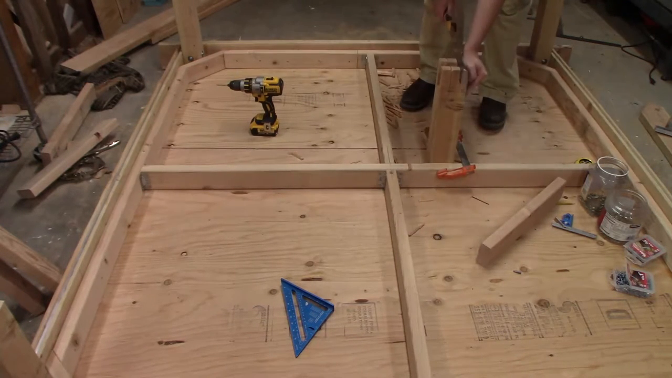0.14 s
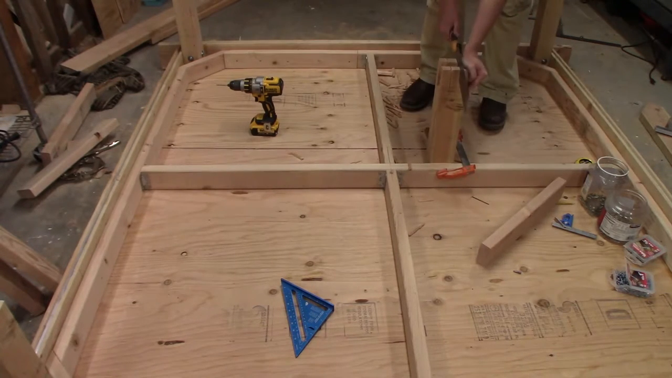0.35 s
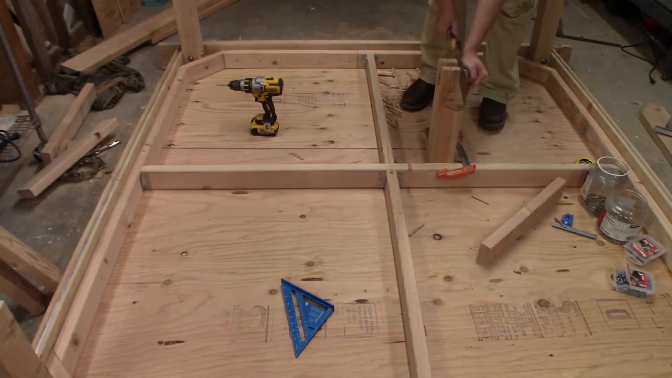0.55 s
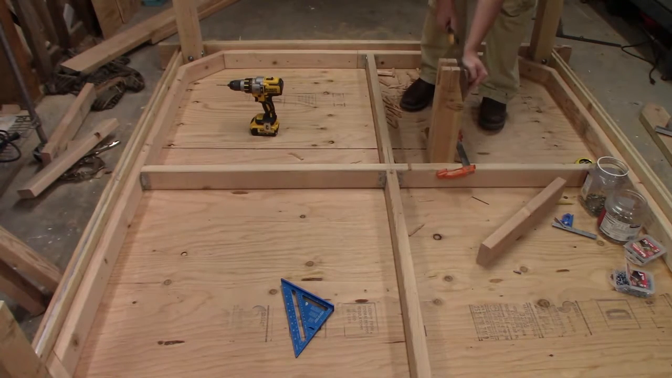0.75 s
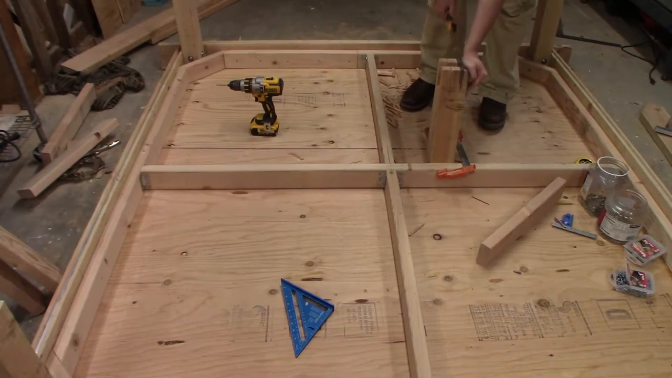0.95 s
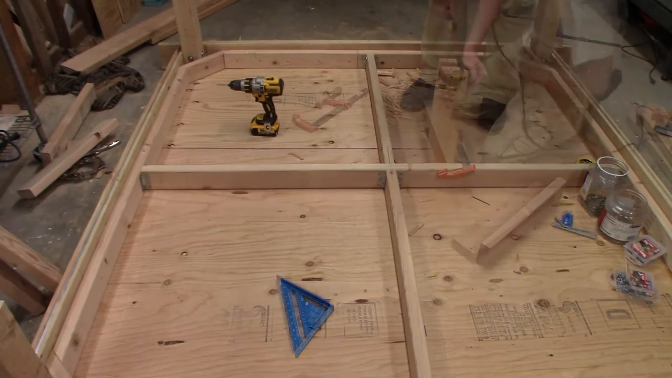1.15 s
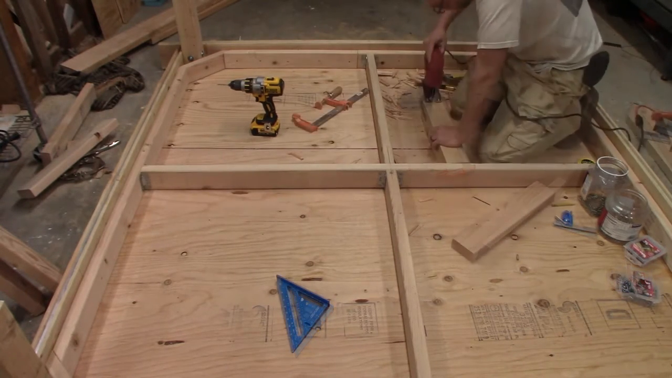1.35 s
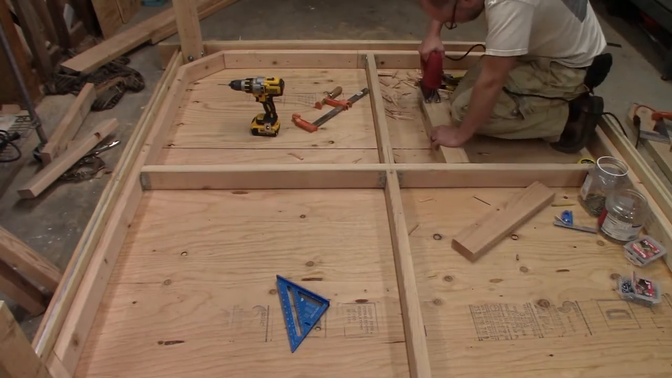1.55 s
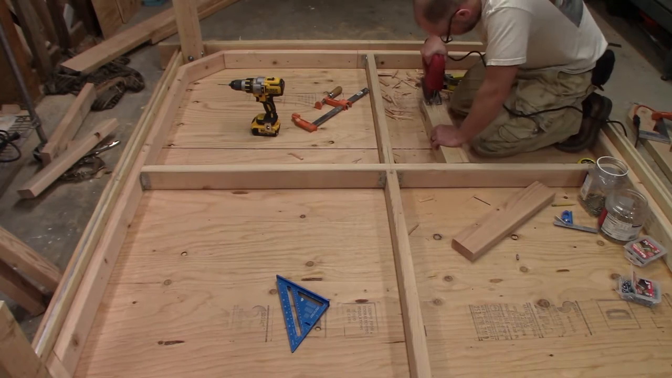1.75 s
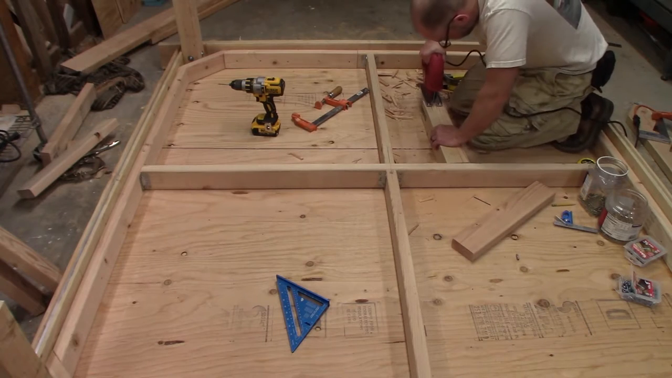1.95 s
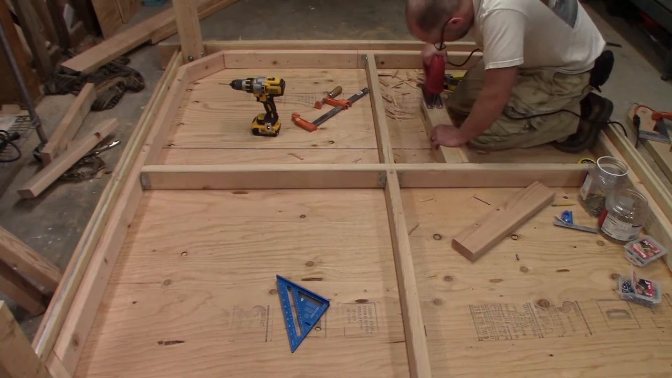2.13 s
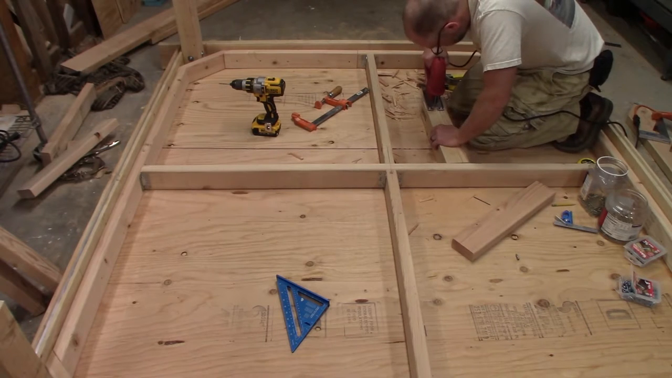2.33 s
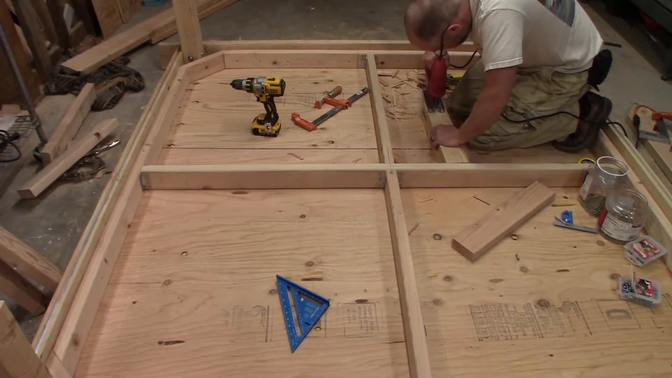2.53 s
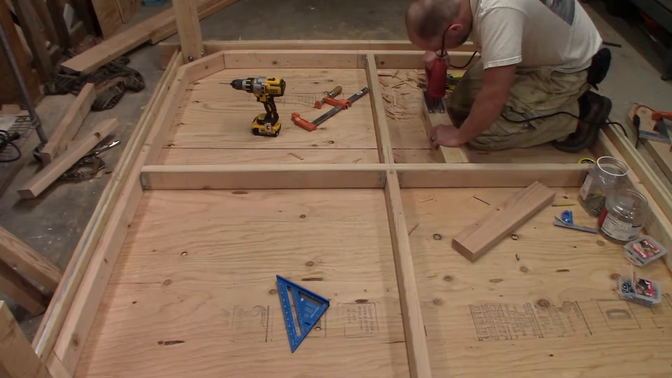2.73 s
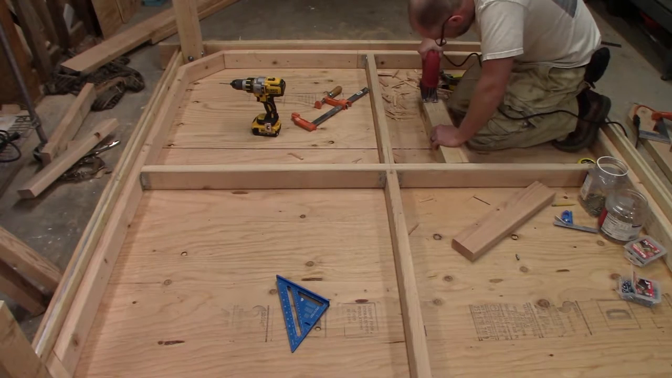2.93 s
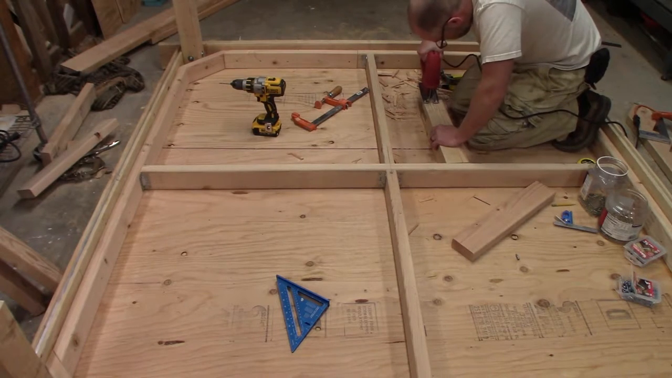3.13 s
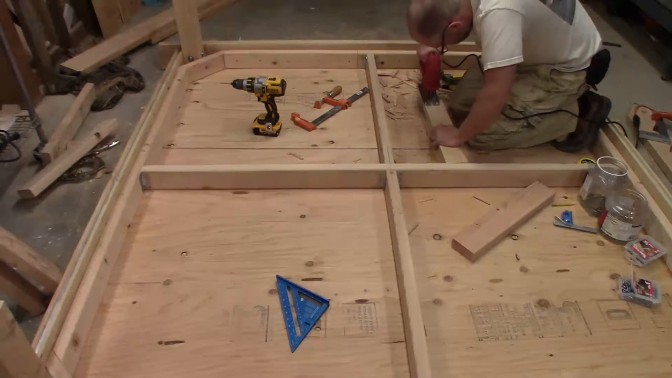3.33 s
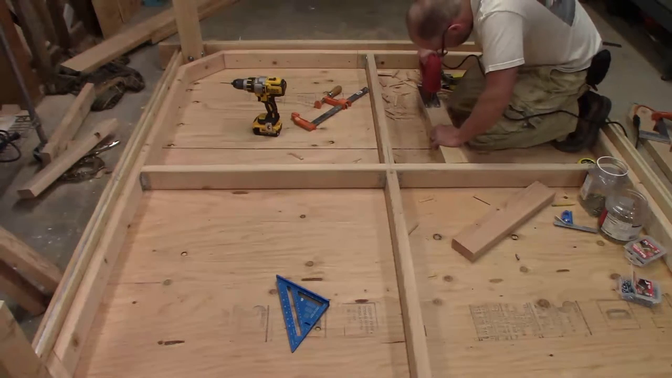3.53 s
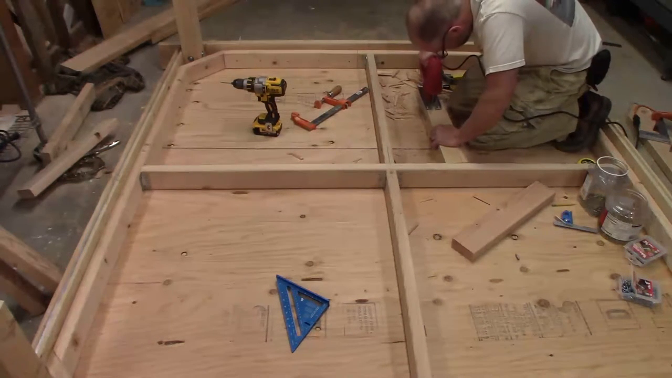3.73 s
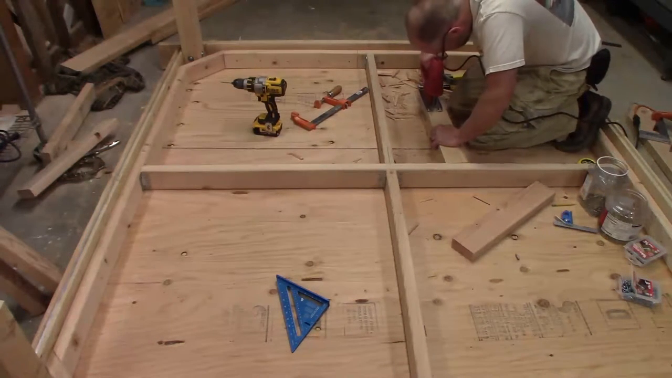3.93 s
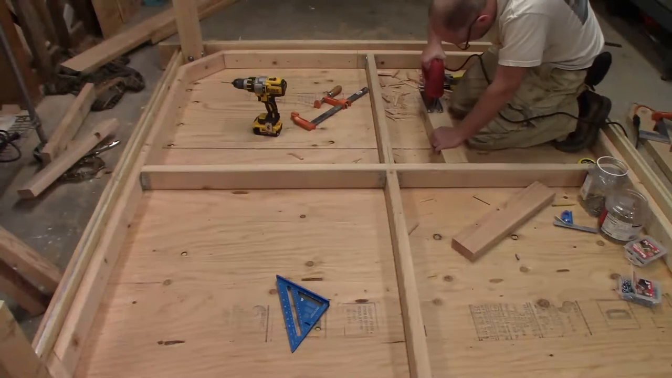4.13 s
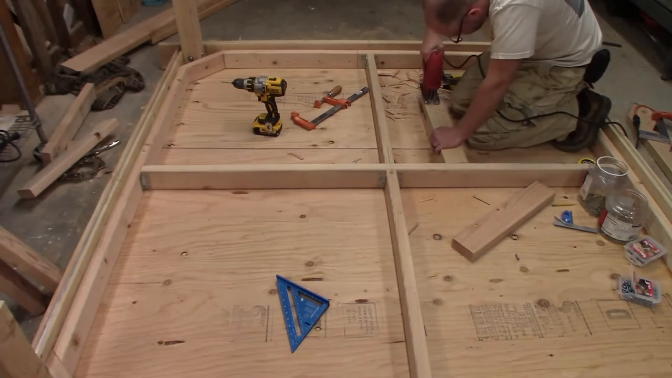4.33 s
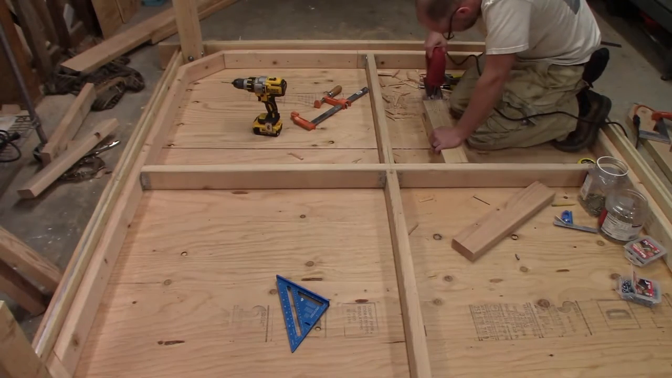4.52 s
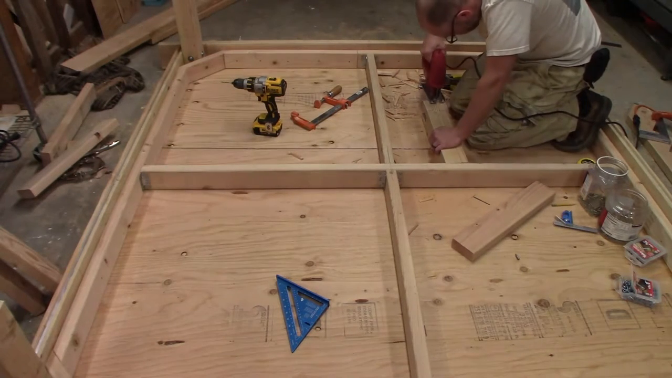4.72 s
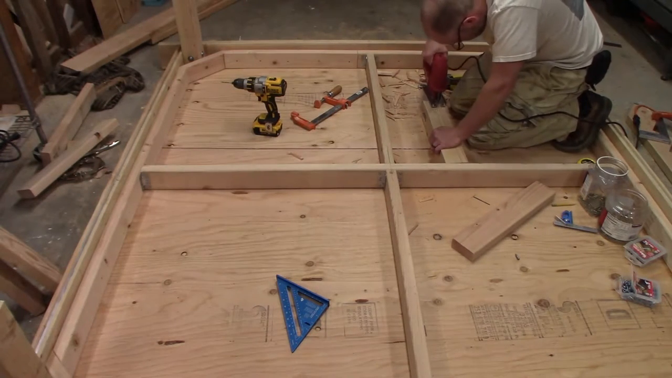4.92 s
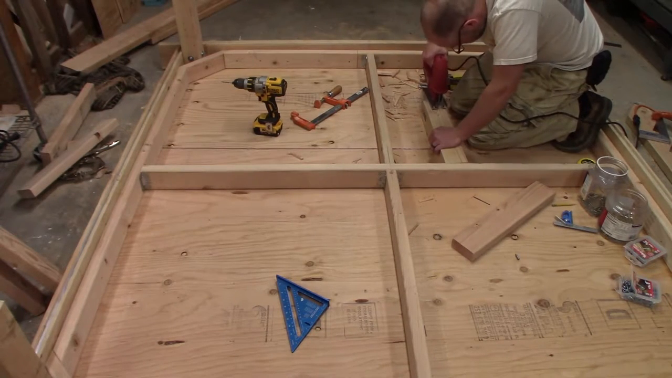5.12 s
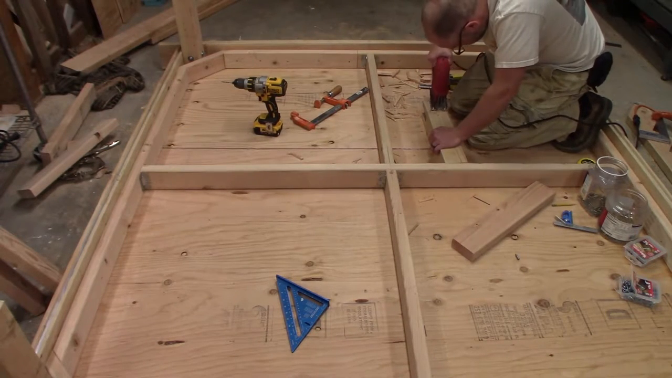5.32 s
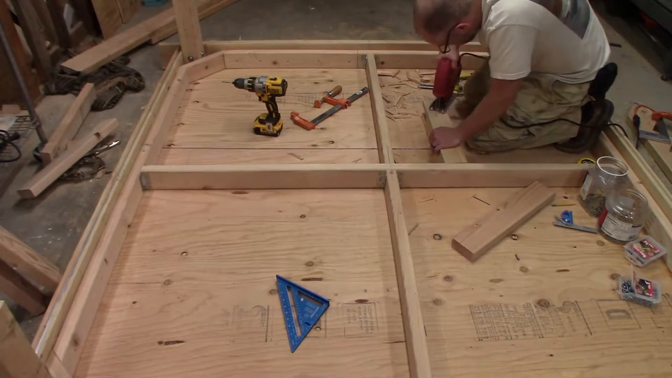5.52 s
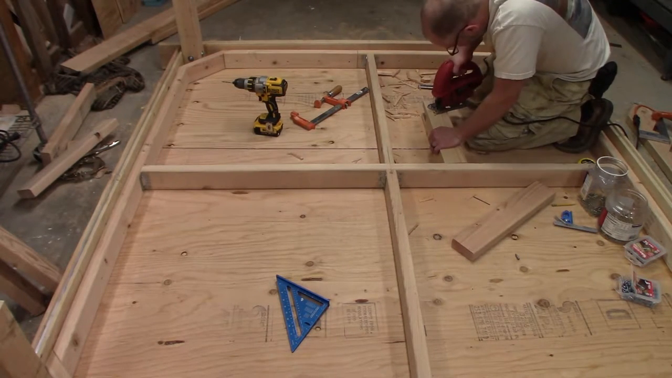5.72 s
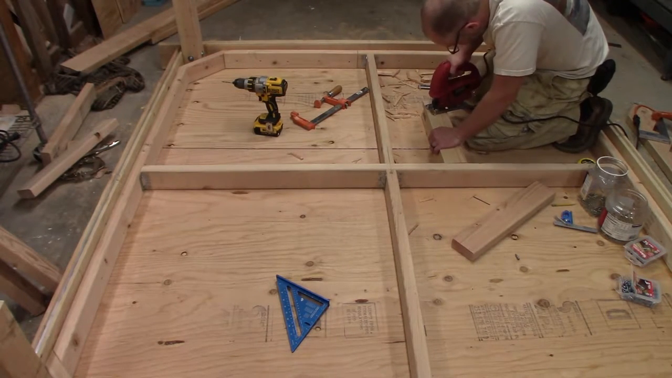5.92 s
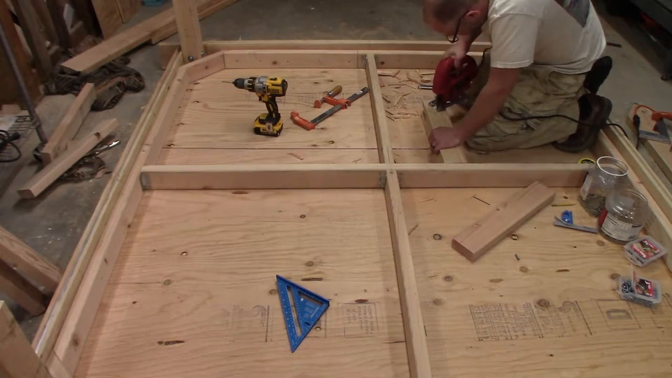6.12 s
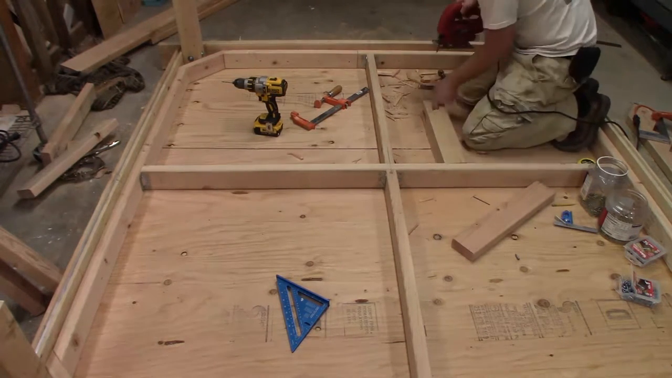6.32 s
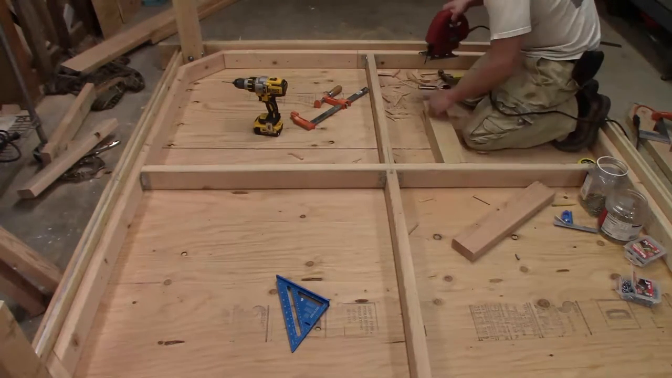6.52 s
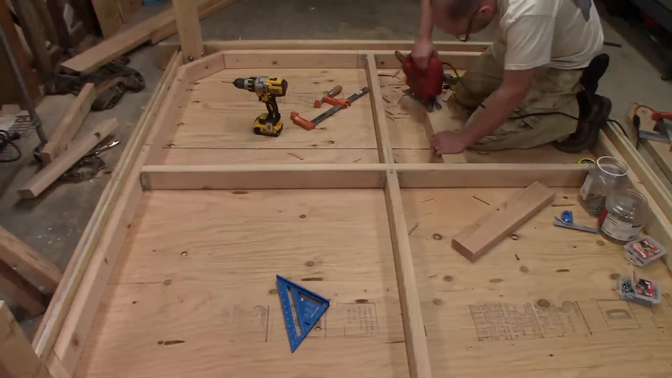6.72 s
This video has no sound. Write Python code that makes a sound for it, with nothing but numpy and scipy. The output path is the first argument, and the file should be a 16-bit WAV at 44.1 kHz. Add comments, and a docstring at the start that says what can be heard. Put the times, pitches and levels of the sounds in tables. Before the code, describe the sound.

Speeded-up workshop sawing: rapid dry hand strokes with a ringing steel edge, ending in a hard cut. Then an electric jigsaw whirs up, chattering as its blade enters the sheet, with hard fast knocks merged into a buzz, coarse rasp and rushing air. The motor falls silent gradually between two runs and after the last. Clacks of timber and metal ticks punctuate it, with short room reflections and quiet room noise.

```python
"""A corded jigsaw runs twice in plywood, heard at several times its natural speed: its gear whines and sinks under
load, each blade stroke knocks the sheet, teeth rasp, air rushes, and after each run the motor coasts down.
Before it, up to an abrupt change of scene, a hand saw scrapes to and fro in short strokes of shaped noise.
Tools and timber knock now and then over quiet room noise; two faint hum tones join in the second scene.
Pulses and tones follow one crank angle; noise and pulses are coloured by the bodies they excite."""
import sys
import numpy as np
from scipy import signal
from scipy.fft import rfft, irfft, next_fast_len
from scipy.io import wavfile
from scipy.ndimage import uniform_filter1d, map_coordinates

SR = 44100
rng = np.random.default_rng(int(sys.argv[2]) if len(sys.argv) > 2 else 0)


def pcm_store(signal):
    """Save signal as 16-bit PCM."""
    levels = np.round(np.clip(np.atleast_2d(signal), -1, 1) * 32767)
    wavfile.write(sys.argv[1], SR, levels.astype(np.int16).T)


N = 298108
TIME = np.arange(N) / SR
SCENE_CHANGE_S = 1.246
SPIN_UP_S = 0.1

# Jigsaw motor in the second run, trigger held. Each row: time in seconds, speed in strokes per second.
SECOND_RUN = [(4.8, 178.1), (4.832, 197.3), (4.894, 211.4), (5.0, 217.4), (5.302, 209.5), (5.448, 217.3),
              (5.708, 200.1), (5.78, 215.9), (6.11, 232.8)]
# Blade pushed into the wood. Each row: touch in seconds, seated in the kerf in seconds, then levels in dB
# of knock, rasp, chatter and scrape, before the trims and ranges applied below.
CUTS = [(1.549, 1.887, -42.5, -50, -32.5, -43), (3.018, 3.35, -42.5, -50.5, -34.5, -52),
        (4.76, 4.895, -37, -49, -42.5, -52), (5.424, 5.475, -44, -49.5, -66, -62),
        (5.801, 5.823, -36, -42.5, -52.5, -57.5)]


def amp(db):
    """Decibels to gain."""
    return 10 ** (np.asarray(db) / 20)


def unit(x):
    """Scale to rms 1."""
    return x / np.sqrt(np.mean(x ** 2) + 1e-20)


def along(points, hz):
    """Read (Hz, value) points on a log frequency axis."""
    f, v = np.transpose(points)
    return np.interp(np.log(hz + 1), np.log(f), v)


def smooth(x, seconds):
    """Running mean."""
    return uniform_filter1d(1. * x, size=max(1, int(seconds * SR)))


def wobble(rate):
    """Smooth random curve at rms 1, rate knots per second."""
    knots = rng.standard_normal(int(N * rate / SR) + 4)
    return unit(map_coordinates(knots, [TIME * rate]))


def sine(turns):
    """Sine of rms 1, one cycle per turn."""
    return np.sqrt(2) * np.sin(2 * np.pi * turns)


def filtered(x, response):
    """x times a response of frequency in Hz."""
    m = next_fast_len(N + SR // 2)
    return irfft(rfft(x, m) * response(np.fft.rfftfreq(m, 1 / SR)), m)[:N]


def coloured(x, spectrum, size=2048):
    """x through a minimum-phase body with the given (Hz, dB) spectrum, at rms 1."""
    gain = amp(along(spectrum, np.fft.rfftfreq(size, 1 / SR)))
    cepstrum = irfft(np.log(gain))
    # fold the cepstrum so that the response is causal
    cepstrum[1:size // 2] *= 2
    cepstrum[size // 2 + 1:] = 0
    impulse = irfft(np.exp(rfft(cepstrum)))
    return unit(signal.fftconvolve(x, impulse)[:N])


def resonant(x, modes):
    """x through (Hz, width Hz, dB) resonances of alternating sign, at rms 1."""
    def response(f):
        total = 0
        for k, (centre, width, db) in enumerate(modes):
            damping = 1j * f * width
            total = total + (-1) ** k * amp(db) * damping / (centre ** 2 - f * f + damping)
        return total
    return unit(filtered(x, response))


def grit(rate, depth_db):
    """Noise broken into grains of uneven size, at rms 1."""
    return unit(rng.standard_normal(N) * amp(depth_db * wobble(rate)))


def pulses(turns, scatter_db, jitter_s):
    """One pulse per whole turn, uneven in size and time."""
    whole = np.arange(1, int(turns[-1]))
    chance = rng.standard_normal((len(whole), 2))
    at = (np.interp(whole, turns, TIME) + jitter_s * chance[:, 0]) * SR
    # windowed sinc places each pulse between samples
    taps = at.astype(int)[:, None] + np.arange(-7, 9)
    offset = taps - at[:, None]
    shape = np.sinc(offset) * np.cos(np.pi * offset / 16) ** 2
    sized = shape * amp(scatter_db * chance[:, 1:])
    return np.bincount(np.clip(taps, 0, N - 1).ravel(), sized.ravel(), N)


def throb(turns, once, twice):
    """Gain at rms 1 that swells once per stroke and again at each reversal."""
    angle = 2 * np.pi * turns
    return unit(np.exp(once * np.cos(angle) + twice * np.cos(2 * angle)))


def workshop(x):
    """Short diffuse tail from floor and walls: unit-energy noise that decays sooner at high pitch."""
    # Each row: frequency in Hz, 60 dB decay time in seconds.
    room_decay = [(200, 0.3), (2000, 0.27), (12000, 0.067)]
    hz, t, z = signal.stft(rng.standard_normal(SR // 4), SR, nperseg=256)
    fading = z * amp(-60 * t / along(room_decay, hz)[:, None])
    tail = signal.istft(fading, SR, nperseg=256)[1]
    return signal.fftconvolve(x, tail / np.linalg.norm(tail))[:N]


def background():
    """Quiet room noise; in the second scene also an uneven rumble and two wavering hum tones."""
    # Room noise spectrum. Each row: frequency in Hz, relative density in dB per Hz.
    room_noise = [(25, -40), (80, -15.5), (170, -28), (270, -19), (430, -5.5), (570, -20.5), (700, -3.5),
                  (1000, -10.5), (1500, -16.5), (2200, -14), (6000, -18.5), (11500, -17.5), (15800, -43.5)]
    # Steady tones. Each row: frequency in Hz, mean level in dB.
    hum_tones = [(693, -82), (1520, -81)]
    hum = np.zeros(N)
    for hz, db in hum_tones:
        hum += amp(db + 2 * wobble(8)) * sine(hz * TIME + .7 * wobble(25) / (2 * np.pi))
    rumble_body = [(20, -18), (80, 1), (150, 0), (400, -28)]
    rumble = amp(-95 + 5.5 * wobble(9.8)) * coloured(rng.standard_normal(N), rumble_body)
    noise = amp(-76 + 0.44 * wobble(7.6)) * coloured(rng.standard_normal(N), room_noise)
    return (hum + rumble) * (TIME > SCENE_CHANGE_S) + noise


def knocks(t60_s=0.056, rise_s=.001):
    """Short contacts of tools and timber: a thud in the floor, a clack of wood and a tick of metal."""
    # Each row: start in seconds, level in dB of thud, clack and tick, relative to one another within a column.
    contacts = [(.148, -71, -71, -80), (1.148, -68, -45.5, -80), (1.374, -86, -73, -64.5),
                (1.548, -70, -56, -49), (1.692, -59, -66, -58), (1.902, -82, -60, -40),
                (3.14, -84, -35.5, -58), (3.191, -65, -55, -62), (4.688, -84, -48, -46),
                (5.82, -90, -38, -50), (6.005, -98, -40.5, -56), (6.419, -90, -61, -49),
                (6.735, -90, -76, -61)]
    bodies = [[(30, -12), (90, -9), (400, -4), (900, 2), (3000, -67)],
              [(100, -54), (500, -38), (900, 11), (1700, 14.0), (2600, 17), (6000, -16)],
              [(200, -55), (1000, -50), (4200, 7), (5500, 3), (7600, 1), (10000, 6), (15000, -11)]]
    sound = np.zeros(N)
    for k, body in enumerate(bodies):
        envelope = np.zeros(N)
        for row in contacts:
            age = TIME - row[0]
            envelope += amp(row[k + 1] - 60 * np.abs(age) / t60_s) * np.clip(age / rise_s, 0, 1)
        sound += envelope * coloured(rng.standard_normal(N), body)
    return sound


def squeak():
    """Thin rising squeak around switch-on: a gliding sine and a weaker one at two thirds of its pitch."""
    start, end = 1.505, 1.546
    hz = 6070 + 3500 * np.clip(TIME - start, 0, end - start)
    phase = 2 * np.pi * np.cumsum(hz) / SR
    gate = uniform_filter1d(1. * ((TIME > start) & (TIME < end)), size=200)
    return gate * (amp(-70) * np.sin(phase) + amp(-82) * np.sin(phase * 2 / 3))


def swell(middle_s):
    """Level of one hand stroke, which rises and falls around its middle."""
    bite_s, release_s = 0.012, 0.012
    t = TIME - middle_s
    return np.exp(-np.minimum(np.abs(t / np.where(t < 0, bite_s, release_s)), 4) ** 3)


def hand_saw():
    """Strokes swell and stop at the turn: teeth catch unevenly, rip the board and ring the steel."""
    # Forward strokes. Each row: middle in seconds, wood level in dB, blade level in dB before the blade trim.
    pushes = [(0.019, -51, -48.5), (.083, -49.5, -50.5), (0.143, -50.5, -54), (0.226, -59.5, -47),
              (0.297, -53.5, -45), (.377, -57, -49), (0.447, -49.5, -46.5), (.519, -50, -49),
              (0.59, -52.5, -49.5), (0.661, -49, -45), (0.73, -48.5, -44.5), (0.799, -47, -43.5),
              (0.867, -48, -44), (.935, -48.5, -45.5), (1.001, -46.5, -44), (1.068, -46, -44.5),
              (1.139, -50.5, -40.5), (1.206, -55, -48)]
    # Board body. Each row: frequency in Hz, relative density in dB per Hz.
    board = [(120, -38), (230, -40), (330, -29), (560, -13.5), (650, -17), (870, -1), (1150, -8),
             (1580, 5.5), (2050, -4), (2650, 6.5), (3500, -8.5), (7000, -12.5), (15000, -22)]
    # Saw steel. Each row: frequency in Hz, relative density in dB per Hz.
    steel = [(400, -37), (1100, -26), (1500, -4.5), (2000, -33), (2800, -7), (3700, -15), (4300, -4),
             (4900, -9), (5500, 4.5), (6300, -4), (7000, -7), (7700, -15), (10000, -14.5), (15800, -16.5)]
    # Low board modes, fading as the kerf deepens. Each row: frequency in Hz, width in Hz, relative level in dB.
    board_boom = [(296, 50, -8), (520, 80, 2)]
    pull_lead_s, wood_lag_s, blade_lead_s = 0.034, 0.0044, 0.001  # the board answers after the blade
    blade_trim_db = -2.5
    # a light pull comes before every push
    strokes = list(pushes) + [(s - pull_lead_s, -64.5, -48.5) for s, _, _ in pushes]
    wood = sum(amp(db) * swell(s + wood_lag_s) for s, db, _ in strokes)
    blade = sum(amp(db + blade_trim_db) * swell(s + blade_lead_s * -1) for s, _, db in strokes) \
        if blade_lead_s < 0 else sum(amp(db + blade_trim_db) * swell(s - .001) for s, _, db in strokes)
    catches = unit(amp(1.45 * wobble(260)))
    ripping = wood * coloured(catches * grit(rate=1500, depth_db=1.0), board)
    ringing = blade * coloured(catches * grit(rate=1300, depth_db=1.0), steel)
    boom_db = -18 - 20 * TIME  # relative to the wood
    boom = wood * amp(boom_db) * resonant(rng.standard_normal(N), board_boom)
    sound = ripping + ringing + boom
    return (sound + amp(-9.5) * workshop(sound)) * (TIME < SCENE_CHANGE_S)


def motor():
    """Strokes per second, drive (0-1) and load (0-1.1): runs up, sags as the blade is fed, coasts when let go."""
    # First run, trigger held. Each row: time in seconds, speed in strokes per second.
    first_run = [(1.56, 167.1), (1.64, 190.3), (1.68, 195.6), (1.85, 203.4), (1.92, 200.3), (1.99, 190.3),
                 (2.37, 192.2), (2.53, 197.3), (2.71, 216.9), (2.77, 219.2), (2.88, 237.7), (3.04, 243.0),
                 (3.14, 233.0), (3.15, 225.6), (3.33, 202.8), (3.42, 195.7), (3.59, 192.2), (3.92, 196.3),
                 (4.07, 204.2), (4.17, 217.8), (4.29, 223.0), (4.34, 230.0)]
    coast_s = 0.403  # time constant
    free_rate, loaded_rate = 241, 189.7  # strokes per second at no load and full load
    inertia_s = 0.1  # lag of the speed behind the load
    speed, driven = np.zeros(N), np.zeros(N)
    for run in (first_run, SECOND_RUN):
        s, rate = np.transpose(run)
        run_up = np.clip(1 + (TIME - s[0]) / SPIN_UP_S, 0, 1)
        coast = np.exp(-np.maximum(TIME - s[-1], 0) / coast_s)
        speed = np.maximum(speed, np.interp(TIME, s, rate) * run_up * coast)
        driven += (run_up > .5) & (TIME < s[-1])
    settled = speed + inertia_s * np.gradient(speed) * SR
    load = driven * np.clip((free_rate - settled) / (free_rate - loaded_rate), 0, 1.1)
    return speed, np.abs(smooth(driven, seconds=0.026)), smooth(load, seconds=0.092)


def entries():
    """Entering (0-1 per cut), scrape and chatter gains: scrapes until seated, chatters less and less."""
    attack_s, chatter_fall_db_per_s = 0.068, 16.5
    entering, scrape, chatter = np.zeros((3, N))
    for touch, seated, _, _, chatter_db, scrape_db in CUTS:
        age = np.maximum(TIME - touch, 0)
        rise = np.minimum(age / attack_s, 1)
        loose = rise * smooth(TIME < seated, seconds=.03)
        entering += loose
        scrape += amp(scrape_db) * loose
        chatter += amp(chatter_db - chatter_fall_db_per_s * age) * rise
    return entering, scrape, chatter


def crank_shake(turns, driven, air_db):
    """Housing shaken by the crank: low harmonics of the stroke rate."""
    # Each row: multiple of the stroke rate, level in dB relative to the air.
    shake = [(1, -53.5), (2, -41), (3, -46.5)]
    harmonics = sum(amp(db) * sine(round(k) * turns) for k, db in shake)
    return amp(air_db + 1.9 * wobble(25)) * driven * harmonics


def crank_clatter(turns, driven, load, air_db):
    """Metal clatter of crank and plunger, one pulse per stroke, harder when the blade is loaded."""
    # Each row: frequency in Hz, relative level in dB.
    clatter = [(300, -39.5), (1500, -5), (2500, 1.5), (3300, -2), (3800, -6), (4300, 4), (4800, -9),
               (5300, -0.5), (6500, -6), (9000, -20.5), (15000, -1)]
    level_db = air_db - 0.5 - 6.9 * (1 - load) - 10.3 * (1 - driven)
    return amp(level_db) * coloured(pulses(turns, scatter_db=2.6, jitter_s=.000004), clatter)


def fan_tones(turns, driven, air_db):
    """Fan tones at five and six times the rotor speed and their sidebands, only while driven."""
    # Each row: multiple of the stroke rate, relative level in dB.
    fan = [(44.25, -4), (45.25, -4), (46.25, 1), (47.25, -2), (48.25, -2), (49.25, -5), (54.5, -7),
           (55.5, -4), (57.5, -7)]
    tones = np.zeros(N)
    for k, db in fan:
        tones += amp(db + 2 * wobble(14)) * np.sin(2 * np.pi * k * turns + .25 * wobble(90))
    return amp(air_db - 9.5) * driven * tones


def air_rush(turns, driven, air_db):
    """Cooling air and sliding parts: throbbing noise that loses its body, not its fine hiss, without drive."""
    # Each row: frequency in Hz, relative density in dB per Hz.
    air = [(300, -48), (900, -16.5), (2000, -7.5), (3400, -1.5), (4200, -1), (4800, -2.5), (5300, 1),
           (5900, -1.5), (6900, -1), (9500, 2.5), (12000, 5), (15800, 3)]
    hiss_hz = 8250
    rush = coloured(grit(rate=810, depth_db=0.8) * throb(turns, once=0.02, twice=0.11), air)
    hiss = filtered(rush, lambda hz: 1 - 1 / (1 + (hz / hiss_hz) ** 6))
    body_db = (-2 + 2.6 * wobble(22)) * (1 - driven)
    return amp(air_db + 2.5) * (hiss + amp(body_db) * (rush - hiss))


def blade_chatter(turns, driven, gain):
    """Blade slaps the kerf at each reversal, some slaps far harder than others."""
    # Each row: frequency in Hz, width in Hz, relative level in dB.
    chatter = [(4140, 650, -12), (5530, 410, -11), (6650, 460, -1), (7250, 450, 1), (7700, 520, -0.5),
               (8820, 480, -9)]
    slaps = grit(rate=350, depth_db=2.0) * throb(turns, once=0.11, twice=0.78)
    return driven * gain * amp(3.5) * resonant(slaps, chatter)


def edge_scrape(gain):
    """Blade flank scraping the edge of the sheet: gritty noise."""
    # Each row: frequency in Hz, relative density in dB per Hz.
    scrape = [(500, -31.5), (2500, -33.5), (3700, -8), (4700, -9), (5500, 8.5), (6200, -9), (10000, -17)]
    return gain * coloured(grit(rate=270, depth_db=2.5), scrape)


def tooth_rasp(turns, contact, rasp_db):
    """Teeth tearing plywood: gritty noise that throbs with the stroke."""
    # Each row: frequency in Hz, relative density in dB per Hz.
    rasp = [(100, -45), (280, -48), (420, -29), (600, -28.5), (850, -11.5), (1250, -6.5), (1700, 9.5),
            (2050, 0.5), (2500, 6), (3000, -6.5), (4200, 3), (5000, -18), (9000, -36)]
    tearing = grit(rate=270, depth_db=1.5) * throb(turns, once=0.032, twice=0.041)
    return contact * amp(rasp_db + 3.5) * coloured(tearing, rasp)


def gear_whine(turns, driven, octaves):
    """Tooth mesh of the crank gear, one turn per stroke; without drive a fainter, rougher whine."""
    teeth = 37
    whine_db = -48 + 18 * octaves - 4.5 * (1 - driven)
    looseness_rad = 0.24 + .25 * (1 - driven)
    level = amp(whine_db + 2.25 * wobble(25) + 2.16 * wobble(70))
    return level * sine(teeth * turns + looseness_rad * wobble(250) / (2 * np.pi))


def blade_knocks(turns, load, contact, knock_db):
    """Each cutting stroke lifts the sheet, the weaker return pushes it back; sheet, housing and shoe ring."""
    # Sheet and housing in the first run. Each row: frequency in Hz, relative level in dB.
    first_sheet = [(190, -43.5), (580, -51), (780, -13), (970, -0.5), (1150, -10), (1360, 3.5), (1550, -12),
                   (1740, 8.5), (1950, 2.5), (2250, -3), (2500, -1), (3300, -13.5), (8000, -34.5),
                   (15000, -47.5)]
    # Sheet where the second run cuts. Each row: frequency in Hz, relative level in dB.
    second_sheet = [(210, -46.5), (640, -34), (850, -21.5), (1070, -3), (1290, -7), (1500, -18),
                    (1710, 11.5), (1930, 7.5), (2150, -3.5), (2330, -5), (2560, 1), (3000, -10), (3700, -8),
                    (5000, -16), (15000, -44)]
    # Narrow rings of shoe and blade. Each row: frequency in Hz, width in Hz, relative level in dB.
    shoe_rings = [(2477, 160, -2), (3140, 170, 3.5), (3800, 98, 2), (4206, 110, -4), (5270, 76, -6),
                  (5730, 160, -13)]
    bend_delay_s, bend_hz = .006, 1002  # travel time at this pitch; lower bending waves are slower
    lift = pulses(turns, scatter_db=1.1, jitter_s=.000006)
    push_back = pulses(turns + .5, scatter_db=2.5, jitter_s=.00002)
    blows = lift - .15 * push_back
    in_first_run = TIME < SECOND_RUN[0][0] - SPIN_UP_S
    sheet = np.where(in_first_run, coloured(blows, first_sheet), coloured(blows, second_sheet))
    spread = filtered(sheet, lambda hz: np.exp(-2j * np.pi * bend_delay_s * 2 * np.sqrt(hz * bend_hz)))
    shoe_db = -61 + 11 * load
    return contact * (amp(knock_db) * spread + amp(shoe_db) * resonant(blows, shoe_rings))


def jigsaw():
    """One crank drives it all: knocks, clatter, tearing teeth, blade chatter, air and gear tones."""
    switch_on_s, fade_in_s = 1.543, 0.019
    contact_load = 0.092  # below this load the teeth barely touch
    air_full_rate = 205.5  # strokes per second; air and whine fall below it
    speed, driven, load = motor()
    entering, scrape_gain, chatter_gain = entries()
    cut = np.maximum(np.searchsorted([row[0] for row in CUTS], TIME) - 1, 0)
    _, _, full_knock_db, full_rasp_db, _, _ = smooth(np.array(CUTS)[cut].T, seconds=0.045)
    contact = np.clip(load / contact_load, 0, 1)
    # until it is seated the blade tears more, and knocks a little more too
    knock_db = full_knock_db - 23.5 * (1 - load) + 1 * entering + 1.8 * wobble(14)
    rasp_db = full_rasp_db - 11.5 * (1 - load) + 5.5 * entering + 2.8 * wobble(20)
    octaves = np.log2(np.minimum((speed + 1) / air_full_rate, 1))
    air_db = -42 + 1.36 * load + 10.5 * octaves
    turns = np.cumsum(speed * (1 + 0.00077 * wobble(60))) / SR

    tones = crank_clatter(turns, driven, load, air_db) + fan_tones(turns, driven, air_db)
    sound = amp(-3) * tones + amp(-2) * workshop(tones)
    sound += crank_shake(turns, driven, air_db)
    sound += air_rush(turns, driven, air_db)
    sound += blade_chatter(turns, driven, chatter_gain)
    sound += edge_scrape(scrape_gain)
    sound += tooth_rasp(turns, contact, rasp_db)
    sound += gear_whine(turns, driven, octaves)
    sound += blade_knocks(turns, load, contact, knock_db)
    return sound * np.clip((TIME - switch_on_s) / fade_in_s, 0, 1)


def scene():
    """Both saws and the knocks in the room, alike in both channels."""
    contacts = knocks()
    mono = background() + contacts + amp(-8) * workshop(contacts) + squeak() + hand_saw() + jigsaw()
    return np.array([mono, mono])


def record(dry):
    """Band limit: nothing passes above the top frequency."""
    top_hz = 15850
    return np.array([filtered(channel, lambda hz: hz < top_hz) for channel in dry])


dry = scene()
out = record(dry)
pcm_store(out)
```